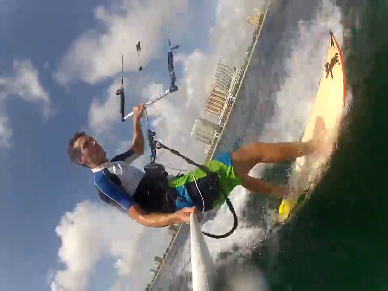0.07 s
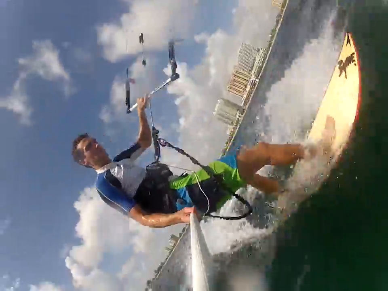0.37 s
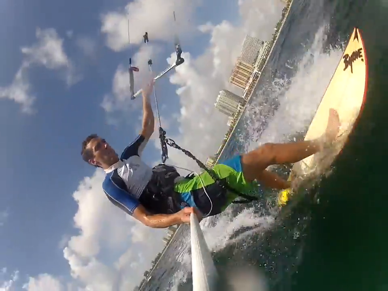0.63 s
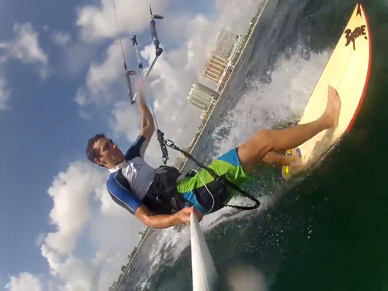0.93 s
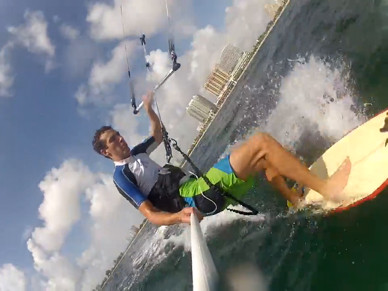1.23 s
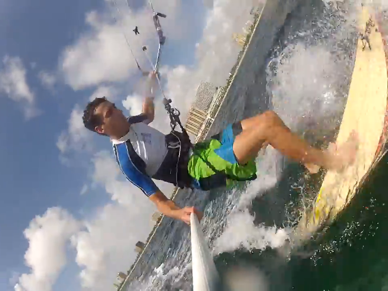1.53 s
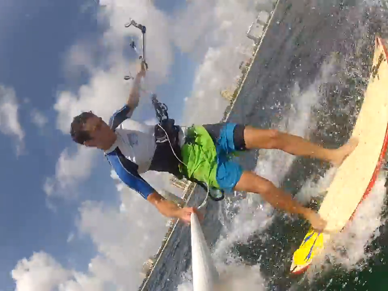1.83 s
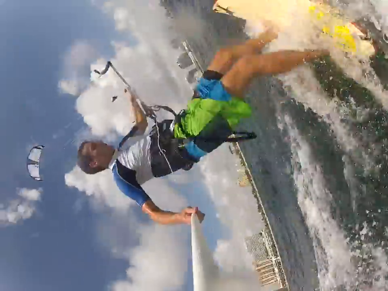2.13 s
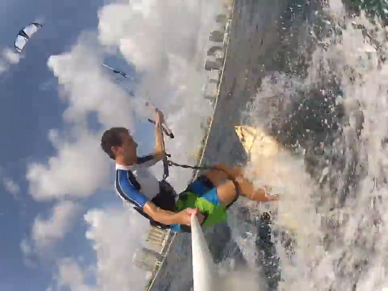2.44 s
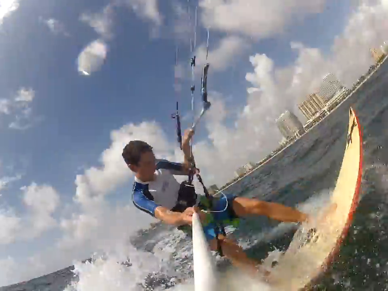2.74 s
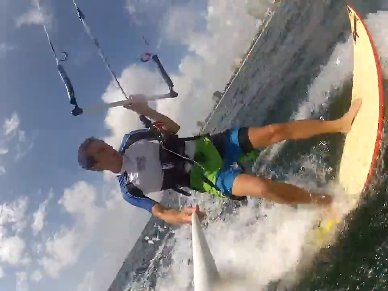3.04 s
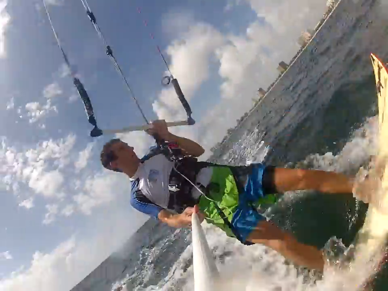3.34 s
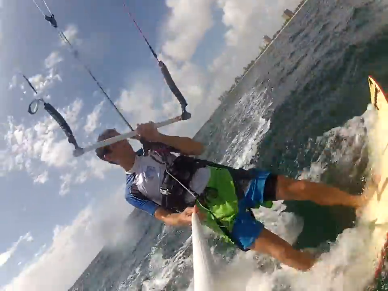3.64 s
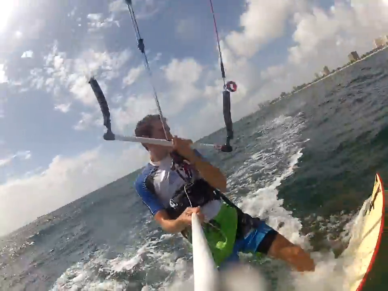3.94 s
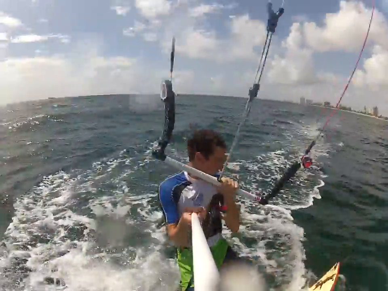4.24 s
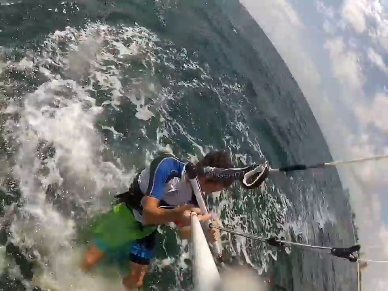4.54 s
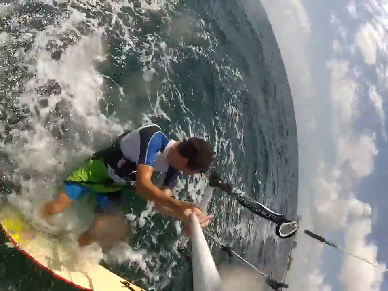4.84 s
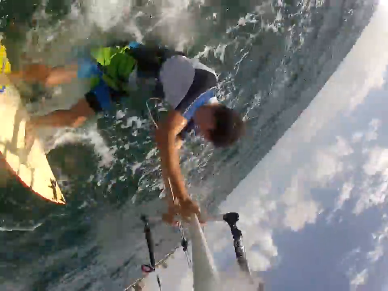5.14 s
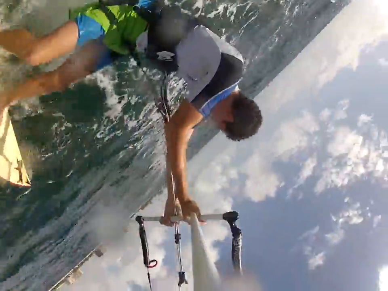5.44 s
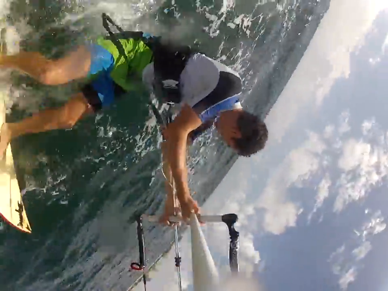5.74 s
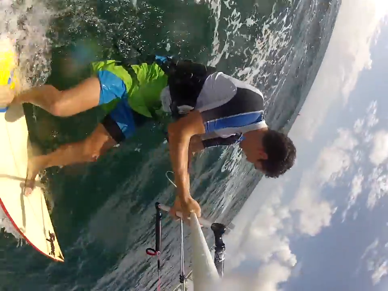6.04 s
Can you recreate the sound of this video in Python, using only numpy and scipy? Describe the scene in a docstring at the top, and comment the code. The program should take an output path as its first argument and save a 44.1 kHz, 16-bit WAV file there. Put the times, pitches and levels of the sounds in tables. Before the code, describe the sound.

Gusty low wind buffeting and splashing sea spray from a kitesurfer's board, building to loud booms and sheets of water hitting the microphone.

```python
"""Wind buffets a sealed camera case that a kitesurfer holds on a pole over choppy sea.
Jolts make the case boom, and lumps of water and single drops strike its shell. Behind them the
board throws hissing spray, air pockets gurgle and fine drops patter.
In a hard turn the case booms loudest and sheets of water rush over it. The camera overloads
there, and its slow converter adds a glassy treble throughout."""
import sys
import numpy as np
from scipy import signal
from scipy.fft import rfft, irfft, next_fast_len
from scipy.io import wavfile
from scipy.ndimage import uniform_filter1d

SR = 44100
rng = np.random.default_rng(int(sys.argv[2]) if len(sys.argv) > 2 else 0)


def transcribe(u):
    """Save the signal u as a 16-bit wav file named by the first command-line argument.

    u: samples, shape (n,) or (channels, n), limited to [-1, 1]; the rate is SR.
    q: integer samples, one column per channel.
    """
    v = np.clip(np.atleast_2d(u).T, -1, 1)
    q = np.round(v * 32767).astype(np.int16)
    wavfile.write(sys.argv[1], SR, q)


N = 269010
TIME = np.arange(N) / SR

# wind on the case, swelling in the turns: (time [s], rumble [dB], relative flutter [dB])
WIND_LEVELS = [(0, -43, -60.5), (1.2, -40, -56.5), (1.57, -24.5, -45.5), (1.74, -32.5, -53),
               (1.98, -22.5, -50.5), (2.3, -26, -47.5), (2.6, -20, -42.5), (3.04, -34.5, -53.5),
               (3.35, -34, -49.5), (3.86, -37.5, -63.5), (4.1, -23.5, -47.5), (4.32, -33.5, -51.5),
               (4.55, -15, -34.5), (4.77, -21.5, -52.5), (4.87, -9, -21), (5.08, -16.5, -24),
               (5.27, -23.5, -38.5), (5.52, -28.5, -48), (5.8, -19, -32), (6.1, -24.5, -40.5)]
# tone of the deep rumble: (frequency [Hz], gain [dB])
RUMBLE_TONE = [(15, 13.5), (26, -7.5), (40, 3), (62, 8.5), (85, -2.5), (103, -0.5), (120, -20), (200, -41)]
# tone of the quicker flutter: (frequency [Hz], gain [dB])
FLUTTER_TONE = [(75, -32), (100, -0.5), (130, -1), (170, -4.5), (245, -5), (310, -25), (400, -24.5),
                (700, -30.5)]
# booms of the jolted case: (middle time [s], level [dB], pitch [Hz], length [s])
CASE_BOOMS = [(1.447, -31, 262, 0.029), (1.955, -16, 106.3, 0.046), (2.414, -11.5, 51.3, 0.041),
              (2.655, -11, 73.4, 0.022), (3.943, -11, 86.6, 0.035), (3.987, -15, 86.6, 0.08),
              (4.228, -6.5, 91.2, 0.052), (4.436, -14, 89, 0.026), (4.483, -9, 60, 0.05),
              (4.529, 11, 74, 0.034), (4.831, 2, 79, 0.037), (4.88, 2, 56.3, 0.06),
              (4.91, -12.5, 244, 0.035), (4.936, -3.5, 80, 0.042), (5.017, -3.5, 73, 0.0335),
              (5.22, -8.5, 88.6, 0.071)]
# sheets of water: (time of full flow [s], relative level [dB], hold [s], rise [dB/s])
WATER_SHEETS = [(4.473, -41, 0.047, 202), (4.66, -39, 0.046, 170), (4.87, -18, 0.0064, 557),
                (4.99, -21.5, 0.043, 303), (5.086, -21, 0.032, 122), (5.328, -37.5, 0.049, 140)]
# tone of those sheets: (frequency [Hz], gain [dB])
SHEET_TONE = [(250, -49), (370, -27), (470, -11.5), (570, -7), (800, 0), (1400, -5), (1800, 6), (2250, -3),
              (2520, -5.5), (2750, -3), (3200, -24), (3550, -2), (4200, -24), (6000, -26.5)]
# where the drenched case rings: (frequency [Hz], width [Hz], boost [dB])
WET_SHELL_PEAKS = [(466, 25, 20), (816, 35, 6), (1100, 52, 6), (1344, 74, 13.5), (1800, 27, 7),
                   (1840, 23, 4.5), (2260, 67, 12.5), (2700, 53, 3)]
# lumps of water hitting the case: (time [s], peak [dB], spatter decay [s], trapped air pitch [Hz])
WATER_SLAPS = [(1.4395, -10.5, 0.0046, 1290), (1.9855, -18.5, 0.0014, 1590), (2.0209, -23, .004, 1800),
               (2.1217, -13, 0.0029, 1650), (2.6272, -12.5, 0.003, 1630), (2.6415, -17.5, 0.0046, 1060),
               (2.7133, -25.5, 0.0035, 1000), (3.9298, -14.5, 0.0052, 1100), (3.941, -20, 0.015, 2100),
               (3.9675, -16.5, 0.016, 1250), (4.2094, -28, .0057, 1920), (4.415, -28.5, 0.0055, 1680),
               (4.5292, -12.5, 0.0015, 550), (4.7946, -23.5, 0.0054, 1700), (4.824, -23.5, 0.0066, 437),
               (4.86, -13, 0.0069, 1290), (5.2212, -10.5, 0.0074, 1100), (5.2582, -15, 0.0031, 1040)]
# how the case rings after a slap: (frequency [Hz], width [Hz], gain [dB])
SLAP_RINGS = [(205, 57, 3), (570, 320, -5), (1025, 104, 3.5), (1290, 250, -3.5), (1800, 300, -5),
              (2300, 200, -5.5), (4020, 140, -23)]
# single drops hitting the case: (time [s], peak [dB], spatter decay [s], trapped air pitch [Hz])
DROP_TICKS = [(.5872, -29, 0.0025, 3340), (.7049, -34.5, .004, 4600), (1.4033, -27, 0.0031, 3840),
              (1.5086, -25, 0.0024, 4800), (2.7652, -29, 0.0023, 3830), (2.787, -21.5, 0.0031, 3620),
              (4.5452, -27, 0.0012, 3400)]
# how the case rings after a drop: (frequency [Hz], width [Hz], gain [dB])
TICK_RINGS = [(2320, 780, -6.5), (3230, 120, -4.5), (3620, 82, -1.5), (4650, 190, -6), (5240, 220, -6)]
# water thrown by the board, as relative levels: (time [s], splash [dB], fizz [dB], churn [dB])
SPRAY_LEVELS = [(0.0, -51.5, -50.5, -62.5), (0.49, -52.5, -50.5, -55.5), (0.93, -57, -56.5, -59.5),
                (1.24, -53.5, -49, -56.5), (1.52, -44.5, -48.5, -51.5), (1.85, -45, -40, -52.5),
                (2.14, -41, -36.5, -51.5), (2.41, -38.5, -40, -48), (2.81, -45, -45.5, -55),
                (3.06, -41.5, -40.5, -46.5), (3.22, -39, -41.5, -48), (3.54, -46, -46.5, -57),
                (3.96, -48, -48.5, -53.5), (4.18, -47.5, -55, -66), (4.4, -51, -56, -74),
                (5.48, -49.5, -55, -54.5), (5.97, -43, -48, -56), (6.1, -44, -46.5, -41)]
# tone of the spray: (frequency [Hz], gain [dB])
SPRAY_TONE = [(150, 10.5), (300, 4), (450, -2), (720, -2), (1150, 8.5), (1480, 12), (2000, 2), (2600, -3),
              (2950, -10), (3500, -8), (4150, -5.5), (4800, -18), (5500, -4.5), (6000, -4)]
# pitches that the case boosts or muffles: (frequency [Hz], width [Hz], boost [dB])
SHELL_PEAKS = [(1060, 30, 9.5), (1518, 360, -11), (1903, 160, 5.5), (2354, 320, 13), (2897, 210, -5.5),
               (2983, 126, 9.5), (3580, 420, 7), (4130, 170, -7.5), (4616, 147, 15), (5040, 100, -9),
               (5130, 220, 9)]
# air gurgling in the spray: (middle time [s], level [dB], pitch [Hz], length [s])
AIR_POCKETS = [(1.659, -46, 400, .07), (3.264, -40, 1700, 0.091), (3.278, -39, 1280, 0.11),
               (5.782, -38.5, 2380, 0.057)]
# fine drops landing on the case: (time [s], level [dB])
PATTER_LEVELS = [(0, -50.5), (.7, -52), (1.2, -54.5), (2.9, -59), (3.8, -59), (4.6, -105), (6.1, -66)]
# how the case rings under them: (frequency [Hz], width [Hz], gain [dB])
PATTER_RINGS = [(1890, 71, 5), (3190, 130, 0), (4663, 120, 4), (5570, 170, -8)]
# levels above which the camera turns itself down: (left [dB], right [dB])
OVERLOAD_DB = [3.5, 1]

GUST_DB, GUST_HZ = 4, 13.5   # size and speed of the random buffeting
RING_OUT_DB, RING_OUT_S = -10.5, 0.027   # the swing left after a jolt, and its decay
SHEET_FALL_DB_PER_S = 426   # each sheet leaves quickly
FILM_DB, FILM_FALL_DB_PER_S = -22.5, 46   # and leaves a thin film that trickles away
FLOOD_S, FLOOD_DB, DRAIN_S = 4.55, -14, 0.95   # water covers the case, muffles the spray, then drains
CHOP_DB, CHOP_HZ = 1.0, 3.36   # the spray swells and sinks over the small waves
CONVERTER_HZ, HOLD_SAMPLES, CUTOFF_HZ = 12000, 4, 15300


def wind():
    """Swirling air shakes the case with a deep rumble and a quicker flutter; both come in gusts."""
    rumble_level, flutter_level = gains(WIND_LEVELS)
    large_swirls = swirls(RUMBLE_TONE, span_s=0.042, evenness=.8)
    small_swirls = swirls(FLUTTER_TONE, span_s=.1, evenness=.7)
    rumble = rumble_level * large_swirls * from_db(GUST_DB * drift(GUST_HZ))
    flutter = flutter_level * small_swirls * from_db(GUST_DB * drift(GUST_HZ))
    return rumble + from_db(-.5) * flutter


def swirls(tone, span_s, evenness):
    """Low noise in which one swirl of air follows another with similar strength."""
    pressure = shape_tone(rng.standard_normal(N), tone)
    power = uniform_filter1d(np.abs(signal.hilbert(pressure)) ** 2, int(span_s * SR))
    return unit_power(pressure / (power + 1e-12) ** (evenness / 2))


def booms():
    """A jolt swings the case for a few low cycles that swell and ring out."""
    out = np.zeros(N)
    for s, db, hz, length in CASE_BOOMS:
        near = (TIME > s - length / 2) & (TIME < s + 8 * RING_OUT_S)
        t = TIME[near] - s
        jolt = np.cos(np.pi * np.minimum(t / length, .5)) ** 2
        tail = from_db(RING_OUT_DB) * np.exp(-np.abs(t) / RING_OUT_S) * (t > 0)
        out[near] += from_db(db) * (jolt + (1 - jolt) * tail) * np.sin(2 * np.pi * hz * t)
    return out


def water_sheets():
    """Sheets of water drum on the wet case as thousands of tiny hits."""
    level = np.max([sheet_flow(*row) for row in WATER_SHEETS], axis=0)
    drops = droplets(per_s=3000, spread_db=2.0, mist_db=-1.0)
    rush = unit_power(through_shell(shape_tone(drops, SHEET_TONE), WET_SHELL_PEAKS))
    return level * rush * from_db(0.66 + 0.62 * drift(53))


def sheet_flow(s, db, hold_s, rise_db_per_s):
    """One sheet of water rises, holds, falls and trickles off; gives a gain per sample."""
    before, after = np.maximum(s - TIME, 0), np.maximum(TIME - s - hold_s, 0)
    fall_db = np.maximum(-SHEET_FALL_DB_PER_S * after, FILM_DB - FILM_FALL_DB_PER_S * after)
    return from_db(db - rise_db_per_s * before + fall_db)


def water_hits(events, rings, spatter_db, pocket_db, pocket_cycles):
    """Water lands with a blow and a spatter that ring the case; air trapped under it adds a pitch."""
    out, t = np.zeros(N), TIME[:SR // 10]
    for s, db, decay, hz in events:
        force = from_db(spatter_db) * rng.standard_normal(len(t)) * np.exp(-t / decay)
        force[0] += 1   # the blow itself
        pocket = from_db(pocket_db) * resonance(force, hz, hz / pocket_cycles)
        ring = ring_shell(force + pocket, rings)
        start = round(s * SR)
        out[start:start + len(t)] += (from_db(db) * ring / np.abs(ring).max())[:N - start]
    return out


def spray():
    """The board throws up low churning, bubbly splashes and high fizz, heard through the case."""
    splash_level, fizz_level, churn_level = gains(SPRAY_LEVELS)
    drops = droplets(per_s=2200, spread_db=4.0, mist_db=3.0) * from_db(1.54 * drift(18.7))
    water = through_shell(shape_tone(drops, SPRAY_TONE), SHELL_PEAKS)
    churn = churn_level * band(water, 247, 795) * from_db(1.5 + 0.65 * drift(16))
    bubbling = from_db(-8.5) * bubbles(per_s=310, cycles=22)
    splash = from_db(-0.54) * splash_level * (band(water, 860, 2700) + bubbling)
    fizz = from_db(-1.0) * fizz_level * band(water, 2885, 5290)
    covered = np.interp(TIME, [FLOOD_S, FLOOD_S + DRAIN_S], [1, 0], left=0)
    return (churn + splash + fizz) * from_db(FLOOD_DB * covered + CHOP_DB * drift(CHOP_HZ))


def bubbles(per_s, cycles, size_count=14):
    """Bubbles burst at random and ring briefly, each size at its own pitch."""
    bursts = (rng.random(N) < per_s / SR) * rng.standard_normal(N)
    size = rng.integers(0, size_count, N)
    rings = (resonance(bursts * (size == k) + 1e-18, hz, hz / cycles)
             for k, hz in enumerate(np.geomspace(450, 2700, size_count)))
    return unit_power(sum(unit_power(ring) for ring in rings))


def gurgles():
    """A collapsing pocket of air rings briefly around the pitch that its size gives."""
    out = np.zeros(N)
    for s, db, hz, length in AIR_POCKETS:
        near = np.abs(TIME - s) < length / 2
        width = 0.27 * hz
        ring = resonance(resonance(rng.standard_normal(N // 20), hz, width), hz, width)
        swell = np.cos(np.pi * (TIME[near] - s) / length) ** 2
        out[near] += from_db(db) * swell * unit_power(ring)[:near.sum()]
    return out


def patter():
    """Fine drops keep the high notes of the case ringing."""
    level, = gains(PATTER_LEVELS)
    drops = droplets(per_s=400, spread_db=2.0, mist_db=0)
    return level * unit_power(ring_shell(drops, PATTER_RINGS))


def droplets(per_s, spread_db, mist_db):
    """Random hits of uneven size over a smooth mist of tiny ones."""
    sizes = from_db(spread_db * np.minimum(rng.exponential(1, N), 4)) * rng.choice([-1, 1], N)
    hits = unit_power(sizes * (rng.random(N) < per_s / SR))
    return unit_power(hits + from_db(mist_db) * rng.standard_normal(N))


def ring_shell(force, rings):
    """A push rings all the notes of the case at once, neighbours swinging opposite ways."""
    return sum((-1) ** k * from_db(db) * resonance(force, hz, width)
               for k, (hz, width, db) in enumerate(rings))


def through_shell(x, peaks):
    """The case lets some pitches through better than others."""
    for hz, width, boost_db in peaks:
        x = x + (from_db(boost_db) - 1) * resonance(x, hz, width)
    return x


def resonance(x, hz, width):
    """Ring at one pitch; a narrower width rings longer."""
    r = np.exp(-np.pi * width / SR)
    feedback = [1, -2 * r * np.cos(2 * np.pi * hz / SR), r * r]
    return signal.lfilter(np.array([1, 0, -1]) * (1 - r * r) / 2, feedback, x)


def shape_tone(x, tone):
    """Turn each frequency up or down along a curve that falls away beyond its ends."""
    size = next_fast_len(N)
    hz, db = np.transpose(tone)
    f = np.maximum(np.fft.rfftfreq(size, 1 / SR), 1)
    ends = np.minimum(f / hz[0], 1) ** 2 * np.minimum(hz[-1] / f, 1) ** 2
    curve = from_db(np.interp(np.log(f), np.log(hz), db))
    return irfft(rfft(x, size) * ends * curve, size)[:N]


def band(x, low_hz, high_hz):
    """Keep one range of pitches, at power 1."""
    band_pass = signal.butter(4, [low_hz, high_hz], "band", fs=SR, output="sos")
    return unit_power(signal.sosfilt(band_pass, x))


def drift(hz):
    """A smooth random wander of about 1 either way; a higher hz wanders faster."""
    step = 40   # samples between random points
    r = np.exp(-2 * np.pi * hz * step / SR)
    slow = signal.lfilter([1], [1, -2 * r, r * r], rng.standard_normal(N // step + 2002))[2000:]
    return np.interp(np.arange(N) / step, np.arange(len(slow)), unit_power(slow))


def gains(rows):
    """Turn each dB column of a table into a gain per sample."""
    times, *columns = np.transpose(rows)
    return [from_db(np.interp(TIME, times, db)) for db in columns]


def from_db(db):
    """Decibels to gain."""
    return 10 ** (np.asarray(db) / 20)


def unit_power(x):
    """Scale to an average power of 1."""
    return x / np.sqrt(np.mean(x ** 2) + 1e-20)


def limiter(x, attack_s, release_db_per_s):
    """Each channel is turned down just after it overloads, and creeps back up."""
    over_db = np.maximum(20 * np.log10(np.abs(x) + 1e-9) - np.array(OVERLOAD_DB)[:, None], 0)
    ramp = release_db_per_s * TIME
    held_db = np.maximum.accumulate(over_db + ramp, axis=1) - ramp
    r = np.exp(-1 / (attack_s * SR))
    return x * from_db(-signal.lfilter([1 - r], [1, -r], held_db))


def scene():
    """Everything reaches both microphones alike through the one case."""
    slaps = water_hits(WATER_SLAPS, SLAP_RINGS, spatter_db=-13, pocket_db=7.5, pocket_cycles=2.3)
    ticks = water_hits(DROP_TICKS, TICK_RINGS, spatter_db=-7, pocket_db=10.5, pocket_cycles=21.0)
    mix = wind() + booms() + spray() + patter() + gurgles() + water_sheets() + slaps + ticks
    return np.tile(mix, (2, 1))


def record(dry):
    """A slow converter clips and holds each sample, adding a glassy treble; the very top is cut."""
    limited = limiter(dry, attack_s=0.0033, release_db_per_s=55.5)
    slow = signal.resample(limited, round(N * CONVERTER_HZ / SR), axis=1)
    clipped = slow / (1 + slow ** 24) ** (1 / 24)
    spectrum = rfft(np.repeat(clipped, HOLD_SAMPLES, axis=1))   # holding mirrors low sounds upward
    hz = np.arange(spectrum.shape[1]) * SR / N
    low_pass = 1 / np.sqrt(1 + (hz / CUTOFF_HZ) ** 300)
    return irfft(spectrum * low_pass, N) * SR / (CONVERTER_HZ * HOLD_SAMPLES)


dry = scene()
out = record(dry)
transcribe(out)
```